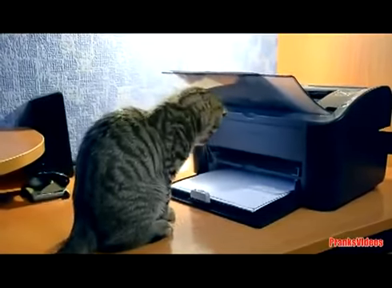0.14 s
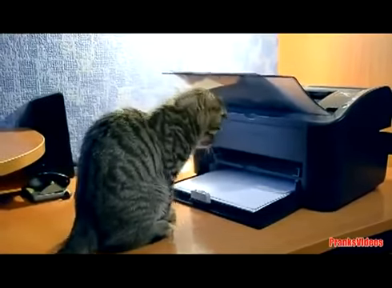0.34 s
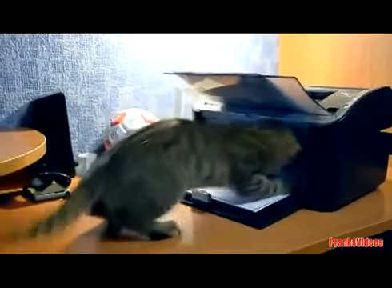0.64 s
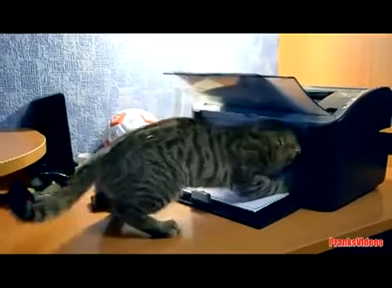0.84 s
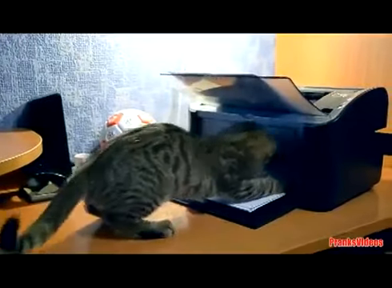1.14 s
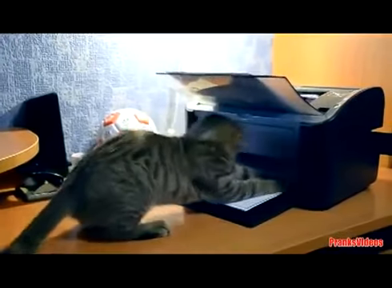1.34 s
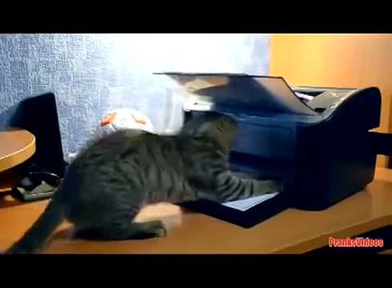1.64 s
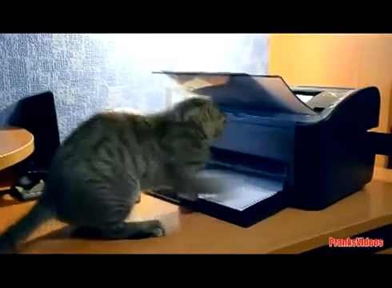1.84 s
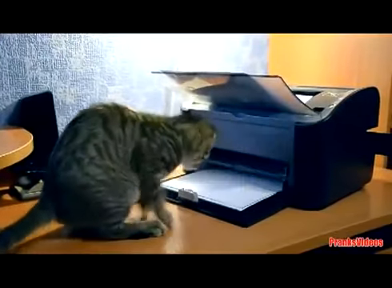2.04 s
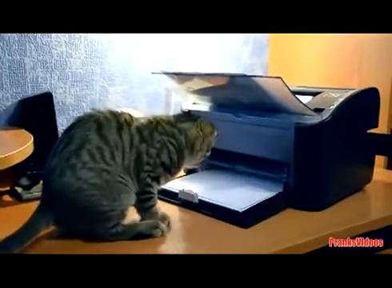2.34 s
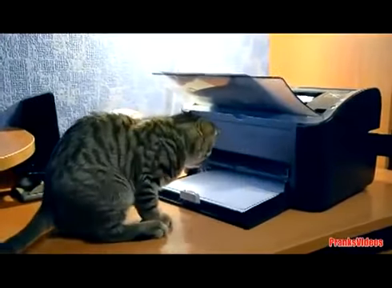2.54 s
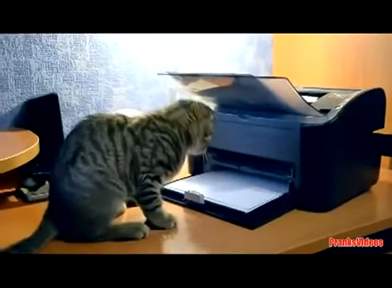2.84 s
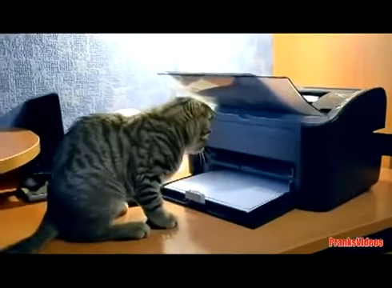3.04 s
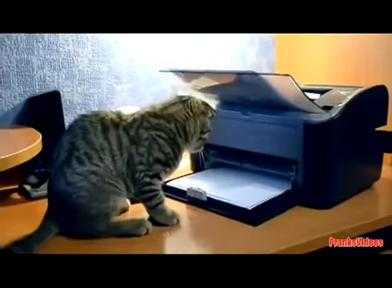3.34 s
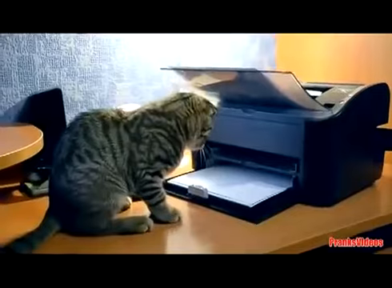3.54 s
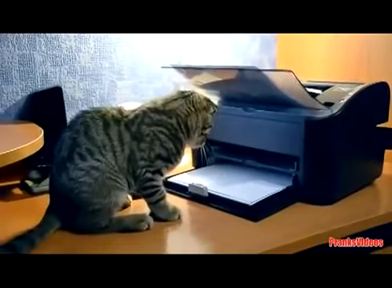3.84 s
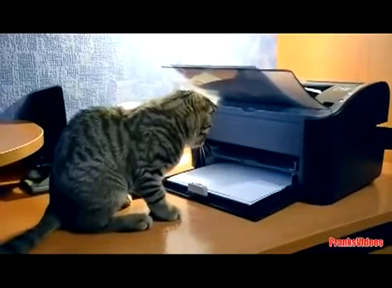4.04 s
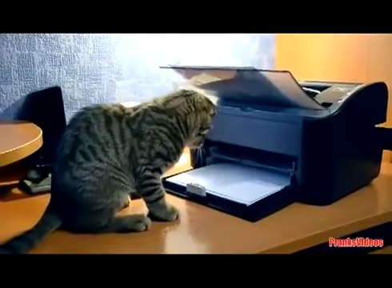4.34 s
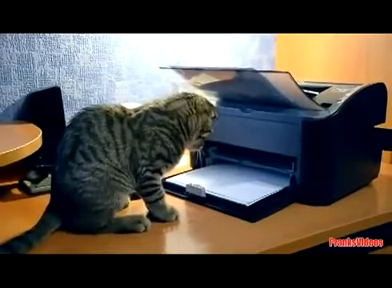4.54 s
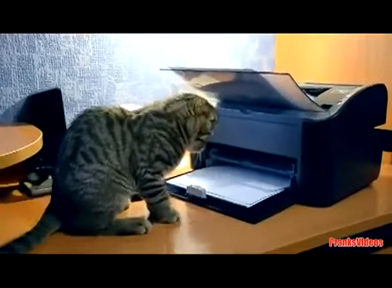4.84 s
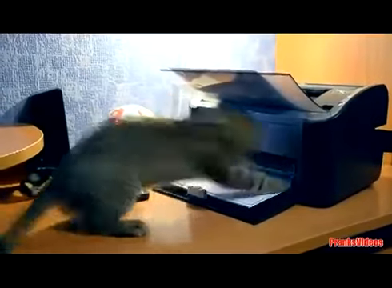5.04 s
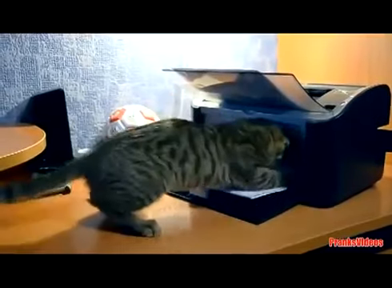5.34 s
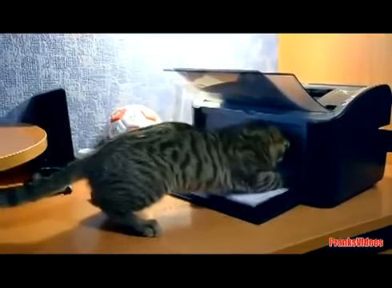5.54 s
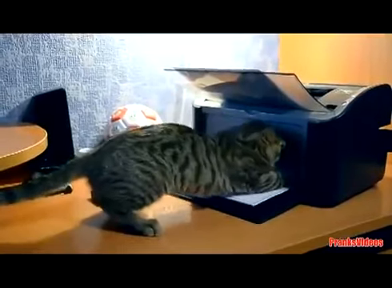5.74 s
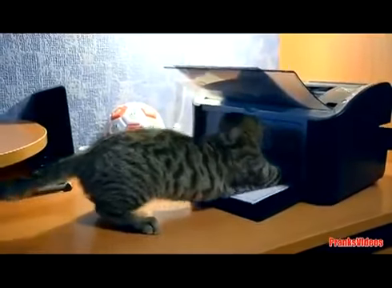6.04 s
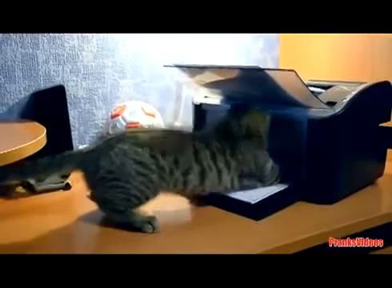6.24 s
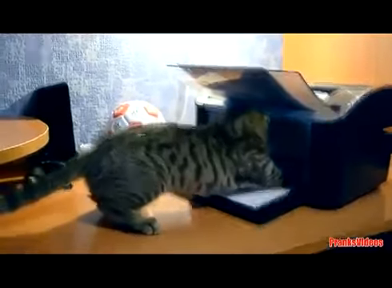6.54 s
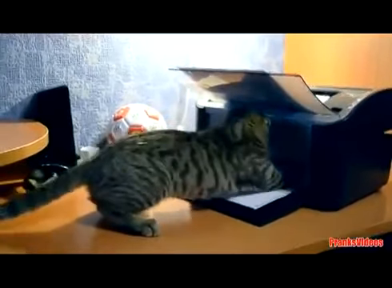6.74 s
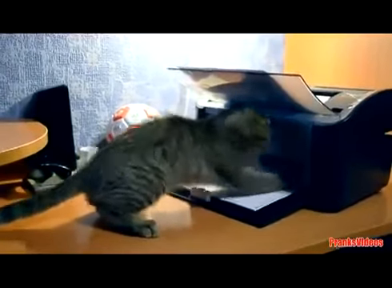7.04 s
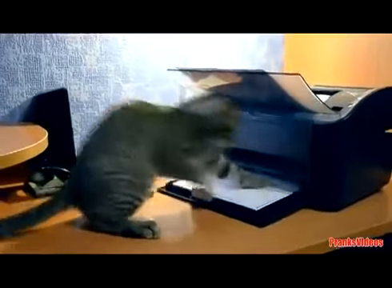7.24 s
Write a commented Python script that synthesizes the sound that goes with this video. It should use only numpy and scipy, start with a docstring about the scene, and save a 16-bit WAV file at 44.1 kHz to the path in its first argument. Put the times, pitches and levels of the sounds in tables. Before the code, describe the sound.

A small desktop printer hums and feeds paper with irregular plastic clicks and clacks, until a cat knocks its tray near the end.

```python
"""Laser printer and a cat

A small printer runs on a wooden desk: its motor hums, gears whine and patter, paper slides and crinkles.
Loose plastic parts click and clack, each with a short rattle that rings in the case and a small room.
Near the end, a cat paws at the hollow paper tray and knocks it against its stop."""
import sys
import numpy as np
from scipy import signal
from scipy.fft import rfft, irfft, next_fast_len
from scipy.io import wavfile

SR = 44100
rng = np.random.default_rng(int(sys.argv[2]) if len(sys.argv) > 2 else 0)


def int16_out(signal):
    """Quantize to a 16-bit WAV file."""
    q = np.round(np.clip(np.atleast_2d(signal).T, -1, 1) * 32767)
    wavfile.write(sys.argv[1], SR, q.astype(np.int16))


N = 325458


def from_db(db):
    """Turn decibels into a number to multiply a sound by."""
    return 10 ** (np.asarray(db) / 20)


def unit_level(x):
    """Scale a sound so that its average strength (rms) is 1."""
    return x / np.sqrt(np.mean(x ** 2) + 1e-20)


def fade_out(t, fade_s):
    """A smooth fall of 60 dB in fade_s seconds; every fade time below means this."""
    return np.exp(-np.log(1000) * t / fade_s)


def add(track, start_s, sound):
    """Mix a sound into the track at the given time."""
    start = int(start_s * SR)
    track[start:start + len(sound)] += sound[:len(track) - start]


def over_time(rows):
    """Join the rows of a table with straight lines: one curve for each column after the time."""
    times, *columns = np.transpose(rows)
    return [np.interp(np.arange(N) / SR, times, column) for column in columns]


def colour_db(colour, hz):
    """Read a colour, a list of how strong the low and high pitches are, at the frequencies hz."""
    centres, db = np.transpose(colour)
    return np.interp(np.log(hz + 1), np.log(centres), db)


def coloured(x, colours, rings):
    """Shape a sound with broad colours and narrow ringing peaks; its strength comes out as 1."""
    hz = np.fft.rfftfreq(len(x), 1 / SR)
    broad_db = sum(colour_db(colour, hz) for colour in colours)
    ring_db = sum(db / (1 + (2 * (hz - centre) / width) ** 2) for centre, width, db in rings)
    cepstrum = irfft(np.log(from_db(broad_db + ring_db)), len(x))
    cepstrum[1:len(x) // 2] *= 2  # folded forward in time, so ringing comes after each hit
    cepstrum[len(x) // 2 + 1:] = 0
    response = np.exp(rfft(cepstrum))
    return unit_level(irfft(rfft(x) * response, len(x)))


def drift(rate_hz):
    """A slow random wander, about 1 either side of zero."""
    step = 100  # samples between random points
    size = next_fast_len(N // step + 2)
    hz = np.fft.rfftfreq(size, step / SR)
    slow = irfft(rfft(rng.standard_normal(size)) / (1 + (hz / rate_hz) ** 2), size)
    return np.interp(np.arange(N) / step, np.arange(size), unit_level(slow))


def grains(size, spread_db, grain_s):
    """A dense run of tiny hits, in clumps of uneven strength."""
    steps = np.arange(size) / (grain_s * SR)
    strength = np.interp(steps, np.arange(size), rng.standard_normal(size))
    return rng.standard_normal(size) * from_db(spread_db * strength)


def spinning_tone(hz, wander_hz, flutter_db):
    """The note of a spinning part whose speed and loudness waver a little."""
    phase = 2 * np.pi * np.cumsum(hz + wander_hz * drift(rate_hz=5.54)) / SR
    return np.sqrt(2) * np.sin(phase) * from_db(flutter_db * drift(rate_hz=21.0))


MOTOR_HZ, WHINE_HZ = 504.3, 1226
# how loud the motor hums (time [s], level [dB])
HUM_LEVELS = [(0, -44), (1.0, -41), (1.5, -44.5), (2.2, -42.5), (3.05, -42.5), (3.63, -45), (3.95, -42.5),
              (5.15, -42.5), (5.4, -39), (5.75, -43.5), (7.38, -42.5)]
# weaker notes of the gears (pitch [Hz], level [dB])
GEAR_TONES = [(419.5, -65), (839.5, -63), (1008.3, -59.5), (1840, -61), (2017, -69), (2153, -76),
              (2955, -74)]
# gear whine, changing with the load (time [s], main note [dB], overtone [dB])
WHINE_LEVELS = [(0, -55, -70), (0.35, -53, -58.5), (0.55, -51.5, -60.5), (0.7, -57, -64), (1.0, -58, -68),
                (1.9, -59.5, -68), (2.45, -54.5, -58.5), (2.8, -59, -59.5), (3.1, -48, -58),
                (3.55, -51, -59.5), (3.8, -50.5, -70), (4.3, -49, -74), (4.8, -56.5, -68), (5.05, -46, -56),
                (5.23, -62, -59), (5.4, -54, -68), (5.7, -53, -70), (6.5, -54, -64), (7.0, -55, -66),
                (7.38, -54, -55)]


def motor():
    """The motor hums on one note, and the gears it turns whine as their teeth meet."""
    hum_db, = over_time(HUM_LEVELS)
    whine_db, overtone_db = over_time(WHINE_LEVELS)
    hum = from_db(hum_db) * spinning_tone(MOTOR_HZ, wander_hz=0.57, flutter_db=1.1)
    gears = sum(from_db(db) * spinning_tone(hz, wander_hz=2.3, flutter_db=-1.0) for hz, db in GEAR_TONES)
    whine = from_db(whine_db) * spinning_tone(WHINE_HZ, wander_hz=2.605, flutter_db=2.0)
    overtone = from_db(overtone_db) * spinning_tone(3 * WHINE_HZ, wander_hz=1.9, flutter_db=2.0)
    return hum + gears + whine + overtone


# how loud the paper feed runs (time [s], gear patter [dB], paper slide [dB])
FEED_LEVELS = [(0.0, -43, -51), (0.4, -49, -56.5), (0.74, -48.5, -57), (0.93, -43.5, -50),
               (1.2, -46.5, -53), (2.0, -46, -53.5), (2.92, -46, -49), (3.1, -47, -53.5), (3.7, -46, -51.5),
               (4.2, -45.5, -51.5), (4.95, -45.5, -51), (5.2, -47.5, -56), (5.42, -42.5, -48.5),
               (5.7, -48, -56), (6.05, -46, -51.5), (6.33, -43, -48.5), (6.65, -46, -52.5),
               (7.38, -44, -50)]
# colour of the gear patter (frequency [Hz], relative level [dB])
GEAR_COLOUR = [(25, -68), (65, -41.5), (130, -7), (190, -7), (380, -3), (620, -2), (950, 0.5), (2000, 1.5),
               (3000, -5), (4500, -23.5), (10000, -31.5)]
# hollows of the housing that the gears set ringing (pitch [Hz], width [Hz], boost [dB])
HOUSING_RINGS = [(91, 16.6, 16.5), (131.4, 11.3, 9), (204.5, 11.4, 8), (265, 9.2, 8.5), (309, 12.6, 12),
                 (368.7, 8.2, 9), (397, 12.6, 7.5), (614, 84, 4.5), (880, 30, 5.5), (1070, 98, 6.5),
                 (1257, 40, 3.5), (1466, 38, 3.5), (2083, 24, 7), (2150, 25, 0.5)]
# colour of the sliding paper (frequency [Hz], relative level [dB])
PAPER_COLOUR = [(1200, -13.5), (3000, 5), (4500, 1), (6900, 0), (8000, -2.5), (9300, -3.5), (10500, -14),
                (12000, -50)]
# a narrow dip in the microphone's treble (frequency [Hz], width [Hz], change [dB])
TREBLE_DIP = [(7940, 230, -11)]


def paper_feed():
    """Gear teeth patter in the housing while the sheet rubs along its guides."""
    gear_db, paper_db = over_time(FEED_LEVELS)
    patter = coloured(grains(N, spread_db=1.0, grain_s=0.0023), [GEAR_COLOUR], HOUSING_RINGS)
    slide = coloured(grains(N, spread_db=1.0, grain_s=0.0028), [PAPER_COLOUR], TREBLE_DIP)
    return from_db(gear_db) * patter + from_db(paper_db) * slide


# colour of crinkling paper (frequency [Hz], relative level [dB])
CRINKLE_COLOUR = [(400, -22), (1000, -4), (1600, 3), (2300, 3), (3400, -10), (5000, -9), (10000, -29),
                  (12000, -45)]
# each crinkle of the sheet (time [s], length [s], level [dB], ring pitch [Hz], ring boost [dB])
CRINKLES = [(0.931, 0.2, -53, 3080, 24), (2.154, 0.42, -51, 2100, 1), (2.502, 0.59, -50.5, 2700, 3),
            (7.029, 0.17, -43, 2600, -1), (7.157, 0.19, -44.5, 1900, -2)]


def paper_crinkles(ring_width_hz=480):
    """The sheet buckles in short, scratchy swells."""
    out, t = np.zeros(N), np.arange(SR) / SR
    for start_s, length_s, db, ring_hz, ring_db in CRINKLES:
        clumps = grains(SR, spread_db=4.5, grain_s=0.004)
        scratch = coloured(clumps, [CRINKLE_COLOUR], TREBLE_DIP + [(ring_hz, ring_width_hz, ring_db)])
        progress = np.clip(t / length_s, 0, 1)
        swell = np.sqrt(np.abs(np.sin(np.pi * progress)))
        add(out, start_s, from_db(db) * swell * scratch)
    return out


def hit(fade_s, sharp_share, colours, rings, rise_share=0.03, bass_hold=1.62):
    """A sharp first touch, then a rattle that builds and dies; the bass lasts bass_hold times longer."""
    t = np.arange(2 * (SR // 6)) / SR
    fade = fade_out(t, fade_s)
    rise = 1 - np.exp(-t / (rise_share * fade_s))
    chatter = grains(len(t), spread_db=2.0, grain_s=0.00154)
    bass = signal.sosfilt(signal.butter(1, 700, fs=SR, output="sos"), chatter)
    rattle = unit_level(((chatter - bass) * fade + bass * fade ** (1 / bass_hold)) * rise)
    touch = unit_level(signal.unit_impulse(len(t)))
    force = np.sqrt(1 - sharp_share) * rattle + np.sqrt(sharp_share) * touch
    return coloured(force, colours, rings) * np.sqrt(np.mean(fade ** 2))


# five ranges of a hit, low to high: thump, knock, middle, snap and tick (centre [Hz])
HIT_BANDS_HZ = [280, 950, 2100, 5200, 9000]
# colour of a hit on the case (frequency [Hz], relative level [dB])
CASE_COLOUR = [(35, -58), (70, -37), (130, -23.5), (300, -10), (600, -6), (850, -0.5), (1400, -3),
               (2200, -2.5), (3000, -8), (4200, -13), (6600, -19.5), (9100, -22.5), (11000, -40)]
# ringing of the case's panels (pitch [Hz], width [Hz], boost [dB])
CASE_RINGS = [(138.5, 7.3, 5.5), (188, 6.7, -3.5), (266, 15, 0), (297, 8.4, 2), (380, 9.9, 7), (437, 17, 4),
              (476, 23, 1), (694, 126, -3.5), (1140, 310, 0.5), (1330, 51, -0.5), (2310, 18, 1),
              (6140, 400, 3.5), (6870, 770, 3), (10130, 830, 6)]


def plastic_part(db, thump_db, knock_db, snap_db, fade_s, rings, sharp_share=0.049):
    """One plastic part rattles against the case and adds ringing of its own."""
    tick_db = -0.5 + 1.7 * snap_db  # the highest range follows the snap
    colour = list(zip(HIT_BANDS_HZ, [thump_db, knock_db, 0, snap_db, tick_db]))
    rise_share = 0.045 * from_db(-0.29 * snap_db)  # snappier hits build up faster
    all_rings = CASE_RINGS + TREBLE_DIP + rings
    return from_db(db) * hit(fade_s, sharp_share, [CASE_COLOUR, colour], all_rings, rise_share)


def feed_ticks(per_second=2.5, level_db=-44.5, spread_db=2.5, low_hz=1000, high_hz=3040):
    """Small parts of the feed tick faintly at random, louder when the gears work harder."""
    out = np.zeros(N)
    gear_db, _ = over_time(FEED_LEVELS)
    load_db = gear_db - gear_db.mean()
    for when, strength, pitch in rng.random((int(per_second * N / SR), 3)):
        db = level_db + load_db[int(when * N)] + spread_db * (2 * strength - 1)
        ring = (low_hz * (high_hz / low_hz) ** pitch, 130, 11)  # (pitch [Hz], width [Hz], boost [dB])
        tick = plastic_part(db, thump_db=2, knock_db=0, snap_db=2, fade_s=0.07, rings=[ring])
        add(out, when * N / SR, tick)
    return out


# notes left singing by the harder hits (time [s], pitch [Hz], level [dB], fade time [s])
PANEL_NOTES = [(0.257, 388, -45, .2), (0.741, 126, -52, 0.15), (0.76, 257, -43, 0.12),
               (1.921, 135, -47, 0.14), (1.924, 400, -42, .13), (2.943, 308, -50, 0.21),
               (3.044, 753, -45, 0.13), (3.95, 1080, -39, .17), (3.962, 465, -28, .09),
               (4.072, 1063, -34, .14), (4.746, 756, -47, 0.13), (5.041, 1160, -31.5, 0.12),
               (5.044, 2155, -27, 0.084), (5.76, 794, -39, 0.18), (6.345, 1290, -36, 0.17),
               (6.736, 400, -33.5, .1), (6.796, 388, -33, 0.12), (6.8155, 880, -24, 0.072)]


def singing_panels(rise_s=0.0027):
    """A struck panel starts to swing and dies away on its own note, making the knock sound hollow."""
    out, t = np.zeros(N), np.arange(SR // 2) / SR
    for start_s, hz, db, fade_s in PANEL_NOTES:
        swing = (1 - np.exp(-t / rise_s)) * fade_out(t, fade_s)
        add(out, start_s, from_db(db) * swing * np.sqrt(2) * np.sin(2 * np.pi * hz * t))
    return out


# colour of a knock on the tray (frequency [Hz], relative level [dB])
TRAY_COLOUR = [(50, -49), (100, -50), (150, 1), (270, -12), (400, 9.5), (660, -3), (1300, 6), (2300, 0),
               (2900, -11), (3700, -17), (4500, -8.5), (5800, -8.5), (6700, -34), (8300, -28), (11000, -44)]
# ringing of the tray (pitch [Hz], width [Hz], boost [dB])
TRAY_RINGS = [(151, 45, 3), (404, 170, 1), (875, 49, 11), (1440, 81, 1), (1790, 120, 6), (1880, 90, -5),
              (7130, 270, 18)]
# the tray knocking under the paw
# (time [s], level [dB], thump [dB], snap [dB], fade time [s], share of sharp first touch [0-1])
PAW_KNOCKS = [(6.764, -32, -9, -1, 0.09, 0.1), (6.7707, -24, -11, 0.5, 0.064, 0.45),
              (6.7918, -22, 2, -2, 0.033, 0.18), (6.7939, -17, -7, 8, 0.016, 0.75),
              (6.797, -28, -1, 15, 0.045, 0.2), (6.815, -33.5, 8, 0, 0.025, 0.3),
              (6.845, -46, -16, 20, 0.21, 0)]


def pawed_tray():
    """Pushed by the paw, the hollow tray scrapes, cracks against its stop and settles with a thump."""
    out = np.zeros(N)
    for start_s, db, thump_db, snap_db, fade_s, sharp_share in PAW_KNOCKS:
        colour = list(zip(HIT_BANDS_HZ, [thump_db, thump_db / 2, 0, snap_db, snap_db]))
        add(out, start_s, from_db(db) * hit(fade_s, sharp_share, [TRAY_COLOUR, colour], TRAY_RINGS))
    return out


# plastic parts striking the case (time [s], level [dB], thump [dB], knock [dB], snap [dB],
# fade time [s], ring pitch [Hz], ring width [Hz], ring boost [dB], high ring pitch [Hz],
# high ring boost [dB], bounce delay [s], bounce level change [dB])
PART_CLACKS = [(0.102, -27.5, -4, 5.5, 4.5, 0.079, 2280, 200, 10.5, 7160, 6, 0.0079, -5),
               (0.138, -30.5, 4, -17, -2, 0.057, 1910, 500, 9, 2920, 4, 0.022, -16),
               (0.181, -34, 15, 3, 6.5, .025, 8700, 900, 12, 6200, 8, .017, -22),
               (0.2551, -22.5, 5, 0, -0.5, 0.076, 1140, 500, 3, 2060, 5.5, .02, -3.5),
               (0.736, -25.5, -1, -0.5, 11, 0.065, 4330, 1500, 2, 6560, 5, 0.013, -1),
               (0.762, -27.5, 8, -2, 2, 0.063, 1350, 300, 10, 6600, -2, 0.018, -8),
               (0.786, -30, -19, 5, 7.5, 0.091, 1300, 400, 4, 6600, 2, 0.029, -20),
               (0.822, -28, -3, -1, 0, 0.064, 1500, 400, 3, 2020, 5, .012, -13),
               (1.01, -42.5, 20, 5, 9.5, 0.14, 3050, 230, 3, 6700, 2, 0.031, -4),
               (1.365, -39.5, -10, 3, 5, .05, 7300, 1200, 6, 5600, -5, .017, -20),
               (1.645, -28.5, -4, -5, 0, 0.041, 3620, 400, 5, 6500, -3, 0.02, -8),
               (1.9171, -22, 7, 2, 3, 0.024, 1050, 400, 0, 4450, 13, .017, -12),
               (1.9228, -21.5, 2.5, 2, 7.5, 0.033, 1290, 500, 3.5, 6460, 9, 0.015, -2.5),
               (2.016, -30, -9, -5, -9, 0.026, 1090, 150, 8, 2000, 1, 0.0079, -8),
               (2.1095, -28, -8, -4, 3.5, 0.039, 1500, 300, 1, 5750, 7, .017, -24),
               (2.941, -27.5, 7, 2.5, 8.5, 0.054, 1280, 160, 11, 2150, 8, 0.028, -10),
               (3.035, -27.5, -2, 3, 2, 0.046, 1900, 500, 4, 7000, 7, 0.015, -17),
               (3.042, -27, 3, 2, 4, 0.051, 746, 90, 9, 1610, 8, 0.04, -15),
               (3.298, -37.5, -6, -3, 3, 0.1, 1210, 100, 2, 7500, 9, 0.012, -19),
               (3.323, -31.5, -5, 1, 3, 0.044, 2000, 600, 9, 8800, 3, 0.015, -16),
               (3.438, -26.8, -7, -14, 10.5, 0.055, 1800, 1400, 8.5, 5700, 8, 0.017, -7),
               (3.849, -35.5, -6, 1, -1, 0.056, 2000, 600, -2, 2900, 2, 0.015, -12),
               (3.948, -22.5, -8.5, 2, -4, 0.061, 1560, 700, 2.5, 4800, 2, 0.015, -0.5),
               (3.993, -27, 1, 6, -8, 0.058, 1080, 250, -1, 730, 7, 0.012, -9),
               (4.0688, -22, -2, -1, -3, 0.083, 1360, 300, 12, 1920, 7, 0.021, -27),
               (4.084, -20.5, 3, -4, -0.5, 0.051, 2530, 1500, 6.5, 6500, 8, 0.0091, -12),
               (4.175, -28.5, 2, 1.5, 6, 0.069, 1430, 200, 9, 4120, 6, 0.014, -12),
               (4.511, -36, -6, 7, 2, 0.052, 6550, 900, 12, 9000, 2, .017, -22),
               (4.565, -35.5, -3, 2, 0, 0.11, 1450, 150, 8, 2400, 4, .017, -14),
               (4.625, -35, -8, -2, 2, 0.076, 1870, 200, 5, 6500, 4, 0.018, 1),
               (4.677, -31, -17, -5, 3, 0.039, 1010, 120, 8, 6500, 2, .017, -11),
               (4.744, -29, 1, 1.5, -5, 0.038, 720, 80, 6.5, 2160, 3, .017, -25),
               (4.91, -28.5, -1, 3, 6, 0.12, 1970, 1100, 8.5, 7000, 8, 0.0076, -6),
               (5.039, -21.5, 2.5, -2, -1.5, 0.078, 1170, 250, 3.5, 2160, 0.5, 0.024, -5.5),
               (5.251, -35, 1, -5, 3, 0.1, 1410, 150, 0, 6500, 2, 0.027, -15),
               (5.274, -27, 1, -1.5, 3.5, 0.076, 1400, 300, 4.5, 5000, 4, 0.03, -4.5),
               (5.463, -33.5, 3, -1.5, 8.5, 0.11, 1330, 300, 10, 2070, 6, .011, -0.5),
               (5.506, -31.5, -5, 1, 3, 0.071, 1506, 180, 7, 6700, 4, 0.021, -26),
               (5.7565, -28, 7.5, 1, -4.5, 0.023, 1680, 400, 10, 2500, 3, .005, -2.5),
               (6.1752, -26, -5, -5, 4, 0.042, 3120, 500, 5, 1580, 12.5, 0.013, -25),
               (6.195, -24.5, 2, 0.5, -3, 0.031, 1350, 500, 3, 6200, 7, 0.014, -20),
               (6.246, -30, -2, -2, -2, 0.021, 1610, 300, -1, 2930, 11, 0.0034, -4),
               (6.315, -40, -20, -2, 12, .015, 9100, 1000, 17, 4700, 7, 0.013, -12),
               (6.3428, -19.5, -3, -3.5, 0.5, 0.043, 1420, 750, 10.5, 5000, 6, .012, -1.5),
               (6.466, -33, 4, -2, 1.5, 0.07, 1220, 100, 6, 2800, 6, 0.021, -21),
               (6.7344, -27, 14.5, 1, -3, 0.031, 1400, 150, 2, 5600, 2, .017, -26),
               (6.884, -32.5, 3.5, 0.5, 2.5, 0.066, 2560, 200, 2, 7200, 1, .015, 1),
               (6.967, -41, -6, -6, 0, .06, 2700, 800, 7, 4800, 15, .017, -18)]


def clacks(high_width_share=0.11, bounce_thump_db=3.5, bounce_snap_db=-3.5):
    """Each loose part strikes, then falls back into its seat with a deeper, duller bounce."""
    out = np.zeros(N)
    for (start_s, db, thump_db, knock_db, snap_db, fade_s,
         ring_hz, width_hz, ring_db, high_hz, high_db, bounce_s, bounce_db) in PART_CLACKS:
        rings = [(ring_hz, width_hz, ring_db), (high_hz, high_width_share * high_hz, high_db)]
        strike = plastic_part(db, thump_db, knock_db, snap_db, fade_s, rings)
        bounce = plastic_part(db + bounce_db, thump_db + bounce_thump_db, knock_db,
                              snap_db + bounce_snap_db, fade_s, rings)
        add(out, start_s, strike)
        add(out, start_s + bounce_s, bounce)
    return out


def room(x, echo_db=-4.5, gap_s=0.0066, low_fade_s=0.27, treble_fade_s=0.17):
    """The desk and walls add a short, blurred echo whose treble dies first."""
    t = np.arange(SR // 2) / SR
    noise = rng.standard_normal(len(t))
    low = signal.sosfiltfilt(signal.butter(2, 3500, fs=SR, output="sos"), noise)
    tail = low * fade_out(t, low_fade_s) + (noise - low) * fade_out(t, treble_fade_s)
    tail *= np.clip(t / gap_s - 0.5, 0, 1)  # the echo takes a moment to come back
    echo = signal.fftconvolve(x, tail / np.sqrt(np.sum(tail ** 2)))[:N]
    return x + from_db(echo_db) * echo


def scene():
    """The running printer and its echoing clatter, in one channel."""
    running = motor() + paper_feed() + paper_crinkles()
    clatter = clacks() + pawed_tray() + feed_ticks()
    return (running + singing_panels() + room(clatter))[None]


def record(dry, cutoff_hz=11176, leak_band_hz=(13100, 14400), leak_db=-7.5):
    """The highest treble is cut off steeply; only a little leaks through."""
    leak = signal.sosfilt(signal.butter(4, leak_band_hz, "band", fs=SR, output="sos"), dry)
    kept = signal.sosfilt(signal.ellip(8, 0.2, 45, cutoff_hz, fs=SR, output="sos"), dry)
    return kept + from_db(leak_db) * leak


dry = scene()
out = record(dry)
int16_out(out)
```